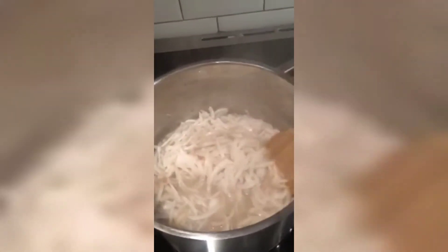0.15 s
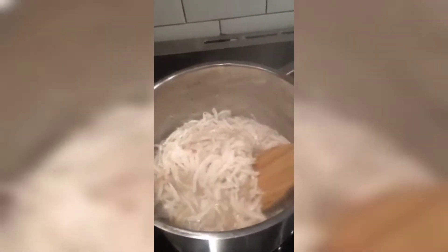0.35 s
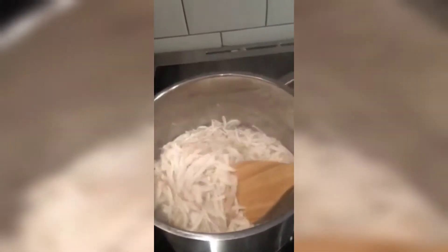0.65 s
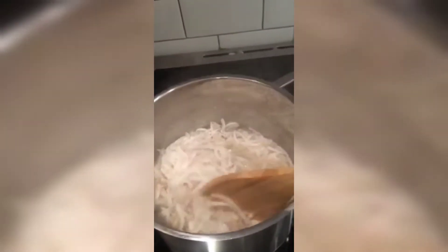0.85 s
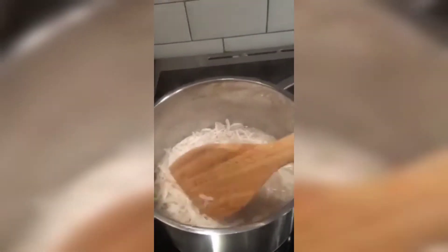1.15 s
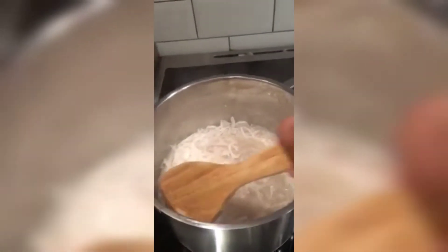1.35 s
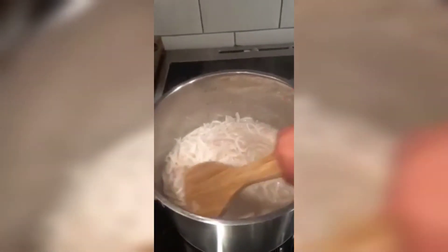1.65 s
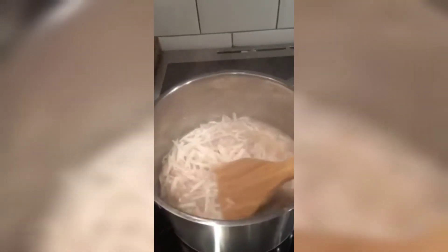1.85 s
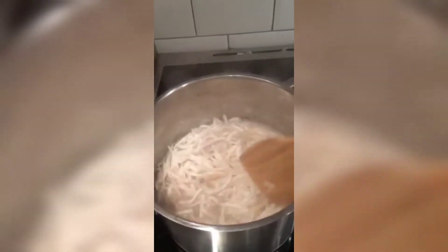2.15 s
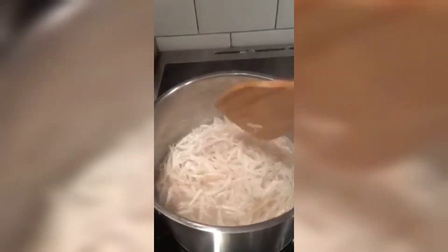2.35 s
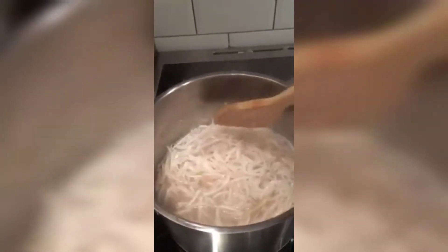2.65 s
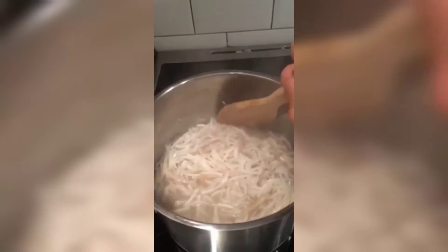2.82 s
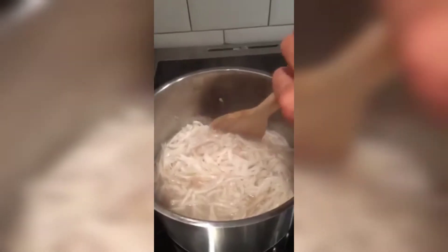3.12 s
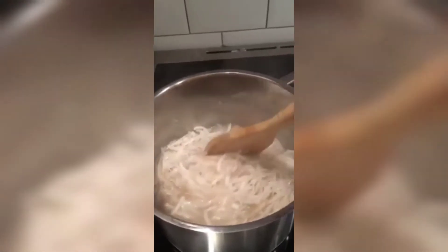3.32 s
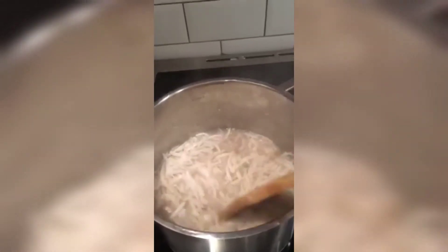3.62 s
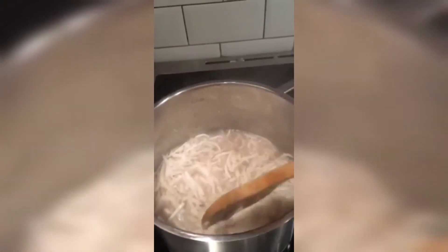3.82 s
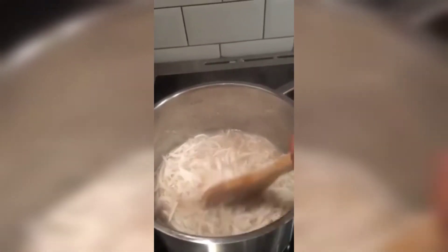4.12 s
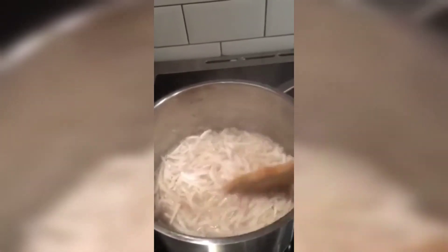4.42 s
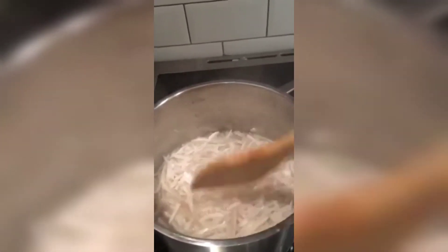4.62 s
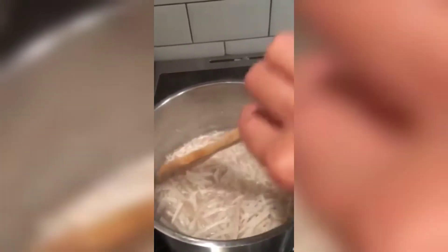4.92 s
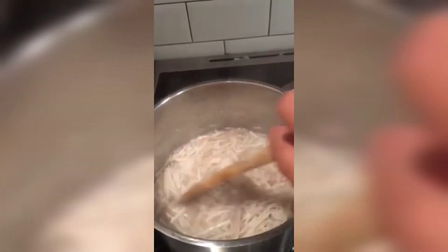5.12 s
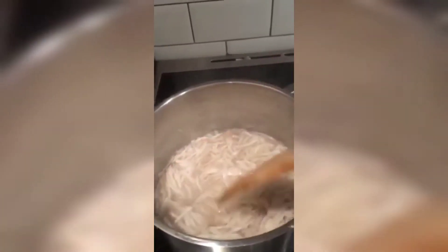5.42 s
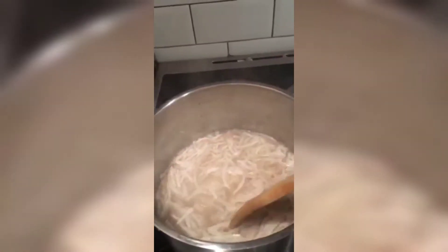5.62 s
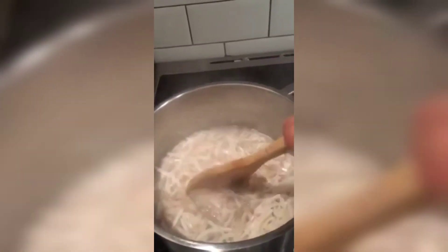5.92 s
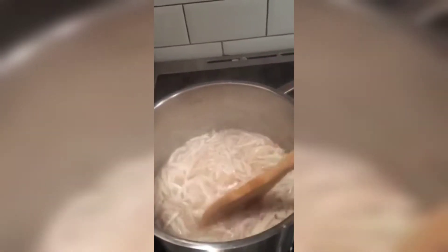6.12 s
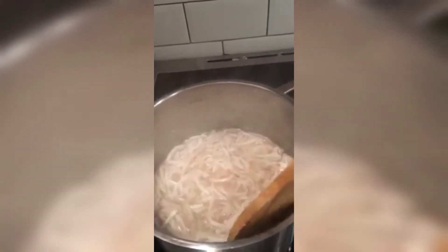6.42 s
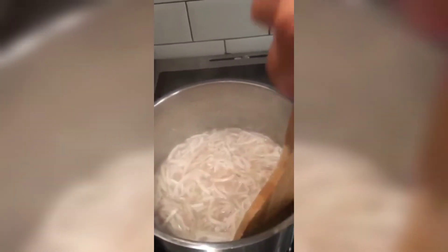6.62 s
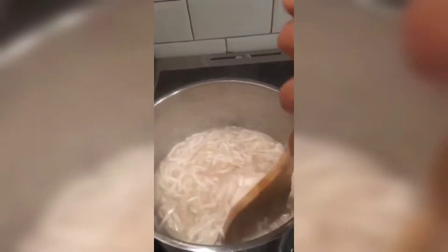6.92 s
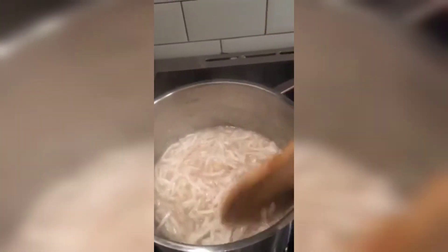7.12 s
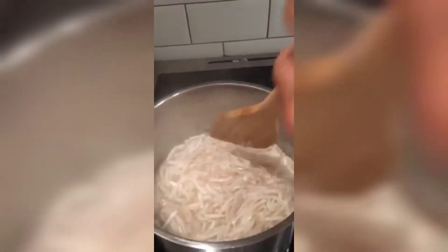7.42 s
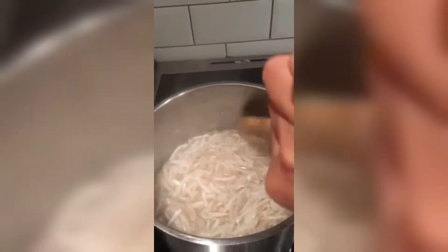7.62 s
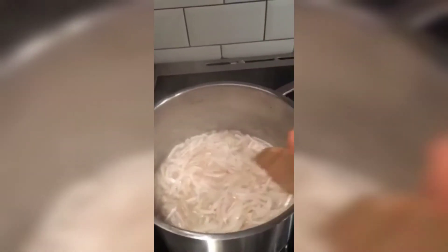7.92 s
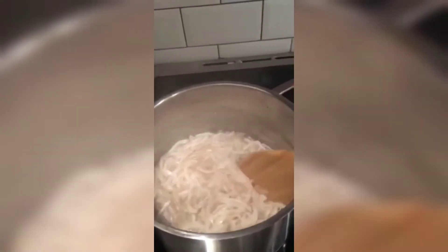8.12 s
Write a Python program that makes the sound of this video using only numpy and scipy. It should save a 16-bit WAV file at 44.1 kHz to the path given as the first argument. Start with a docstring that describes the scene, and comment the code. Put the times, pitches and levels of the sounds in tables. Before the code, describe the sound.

Close, quiet stirring of moist rice with a wooden spoon, occasional hard clacks on the metal pot, and a low kitchen motor hum beneath.

```python
"""Stirring wet rice in a steel pot

A wooden spoon stirs wet rice in a pot on a stove, close to the microphone.
Knocks set pot modes ringing and start decaying noise bands; drags are gritty noise through resonances.
The rice smacks (short noise bursts), plops (rising sines) and crackles (clicked resonators).
A kitchen motor hums in sines over resonant low rumble and noise-band room noise."""
import sys
import numpy as np
from scipy import signal
from scipy.io import wavfile

SR = 44100
rng = np.random.default_rng(int(sys.argv[2]) if len(sys.argv) > 2 else 0)


def wav_out(sig):
    """Save sig, one row per channel (or a flat mono array), as 16-bit PCM at SR to the path in sys.argv[1]."""
    wavfile.write(sys.argv[1], SR, np.round(np.clip(np.atleast_2d(sig).T, -1, 1) * 32767).astype(np.int16))


N = 364266

# Spoon on pot. Each row: time in seconds, ring in dB, clatter in dB before its common gain,
# contact corner in Hz (lower if softer), crack over clatter in dB, place.
KNOCKS = [(0.111, -42.5, -46.5, 1310, 5, "bottom edge"), (1.263, -14.5, -27, 3500, 12, "left wall"),
          (2.060, -33.5, -37, 1090, -22, "mid bottom"), (2.712, -20.5, -27.5, 3200, 5, "far wall"),
          (6.345, -25, -29.5, 1490, 7, "near wall"), (6.358, -27, -28, 1180, -12, "near wall"),
          (6.381, -36, -37, 3840, 2, "far wall"), (7.590, -11, -21, 4000, 4, "rim"),
          (8.079, -28.5, -31.5, 1170, -22, "bottom edge")]
# Motion of the wet rice. Each row: time in seconds, reference level of its fine sounds in dB.
WETNESS = [(0.0, -100), (0.27, -70.5), (0.55, -73.5), (0.85, -67), (1.5, -70.5), (2.11, -68), (2.39, -76),
           (2.78, -66), (2.97, -85), (3.47, -68), (3.8, -76.5), (3.98, -65.5), (4.6, -76.5), (5.27, -67.5),
           (5.45, -72), (6.3, -72.5), (6.53, -66.5), (7.2, -75.5), (7.55, -84), (7.73, -73.5), (8.26, -70)]


def from_db(db):
    """Decibels to gain."""
    return 10 ** (np.asarray(db) / 20)


def rms_one(x):
    """Scale to unit rms."""
    return x / np.sqrt(np.mean(x ** 2) + 1e-20)


def in_time(rows):
    """Columns of a curve at every sample."""
    s, *columns = np.transpose(rows)
    return [np.interp(np.arange(N) / SR, s, c) for c in columns]


def at_hz(points, hz):
    """Read a spectrum on a log-frequency axis."""
    points_hz, values = np.array(points).T
    return np.interp(np.log(hz), np.log(points_hz), values)


def drift(rate_hz):
    """Slow random wander of unit rms: noise through two equal poles at SR / 40, interpolated."""
    r = np.exp(-80 * np.pi * rate_hz / SR)
    noise = rng.standard_normal(N // 40 + 2002)
    slow = signal.lfilter([1], [1, -2 * r, r * r], noise)[2000:]   # settled part
    return np.interp(np.arange(N) / 40, np.arange(len(slow)), rms_one(slow))


def ring(clicks, hz, t60_s):
    """A unit click sets a decaying sine of initial height 1 ringing."""
    r, w = from_db(-60 / (t60_s * SR)), 2 * np.pi * hz / SR
    return signal.lfilter([0, np.sin(w)], [1, -2 * r * np.cos(w), r * r], clicks + 1e-18)


def fade(clicks, t60_s):
    """Each click starts an envelope that dies by 60 dB in t60_s."""
    return signal.lfilter([1], [1, -from_db(-60 / (t60_s * SR))], clicks + 1e-18)


def resonances(x, peaks):
    """Parallel resonances of alternating sign, summed to unit rms; peaks hold Hz, width in Hz, dB."""
    out = 0
    for k, (hz, width_hz, level_db) in enumerate(peaks):
        r = np.exp(-np.pi * width_hz / SR)
        b = (1 - r * r) / 2 * np.array([1, 0, -1])
        a = [1, -2 * r * np.cos(2 * np.pi * hz / SR), r * r]
        out = out + (-1) ** k * from_db(level_db) * signal.lfilter(b, a, x)
    return rms_one(out)


def band_pass(x, low_hz, high_hz):
    """Butterworth band-pass."""
    return signal.sosfilt(signal.butter(2, [low_hz, high_hz], "band", fs=SR, output="sos"), x)


def bands():
    """Third-octave bands of noise, flat per Hz, with their centres."""
    edges_hz = 22 * 2 ** np.arange(0, 9.1, 1 / 3)
    white = rng.standard_normal((2, N))   # neighbours use different noise
    for k, (low_hz, high_hz) in enumerate(zip(edges_hz, edges_hz[1:])):
        yield np.sqrt(low_hz * high_hz), band_pass(white[k % 2], low_hz, high_hz)


def blows(levels):
    """One click per knock."""
    clicks = np.zeros(N)
    clicks[[round(k[0] * SR) for k in KNOCKS]] = levels
    return clicks


def contact(hz):
    """Size of every blow at one frequency: a soft contact loses the treble."""
    level_db, corner_hz = np.array([k[2:4] for k in KNOCKS]).T
    return from_db(level_db) / (1 + (hz / corner_hz) ** 2)


def grains(per_s, low_hz, high_hz, cycles, spread_db):
    """Clumped random clicks of uneven size, dealt to resonators spread in pitch; unit rms."""
    sizes = from_db(spread_db * np.minimum(rng.exponential(1, N), 4)) * rng.choice([-1, 1], N)
    born = rng.random(N) < per_s * from_db(6.0 * drift(15)) / SR
    pitches_hz, dealt = np.geomspace(low_hz, high_hz, 18), rng.integers(0, 18, N)
    return rms_one(sum(ring(sizes * born * (dealt == k), hz, cycles / hz)
                       for k, hz in enumerate(pitches_hz)))


def hum():
    """Motor lines on one wandering shaft rate, surging rumble below the fundamental, and a drone."""
    # Each row: time in seconds, fundamental rms in dB.
    fundamental = [(0.0, -69), (0.41, -59), (1.03, -61.5), (1.7, -57.5), (2.02, -63), (2.42, -59.5),
                   (2.71, -55.5), (3.11, -63.5), (3.85, -56), (4.25, -68), (4.46, -60.5), (4.78, -57),
                   (5.41, -62.5), (5.96, -56), (6.42, -66), (6.76, -57), (7.41, -60), (8.07, -57)]
    # Upper motor lines. Each row: multiple of the shaft rate, mean rms level in dB.
    multiples = [(2, -71), (5, -71), (6, -72), (14, -87), (15, -88)]
    # The rumble ebbs. Each row: time in seconds, level in dB before surges.
    ebb = [(0.0, -54), (1.3, -63), (4.1, -68.5), (4.6, -86), (5.0, -72.5), (8.26, -68)]
    # Blurred low tone: centre in Hz, width in Hz, rms in dB.
    drone_peak = (88, 4.1, -72.5)
    mean_shaft_hz, rumble_surge_db = 57.4, 3.0
    turn = 2 * np.pi * np.cumsum(mean_shaft_hz * (1 + 0.002155 * drift(1))) / SR
    tone_db, = in_time(fundamental)
    lines = sum(from_db(level_db + 1.9 * drift(1)) * np.sin(round(k) * turn + k)
                for k, level_db in multiples)
    motor = np.sqrt(2) * (from_db(tone_db) * np.sin(turn) + lines)
    rumble = resonances(rng.standard_normal(N), [(46.0, 4.0, 0)])
    rumble_db = in_time(ebb)[0] + rumble_surge_db * drift(1.73)
    drone = from_db(drone_peak[2]) * resonances(rng.standard_normal(N), [drone_peak])
    return motor + from_db(rumble_db) * rumble + drone


def room_noise():
    """Steady noise bands whose levels waver, partly together."""
    # Each row: frequency in Hz, relative density in dB per Hz.
    spectrum = [(25, -6), (45, -7.5), (70, -3.5), (97, -3.5), (160, -10), (234, -10.5), (310, -10),
                (420, -16), (830, -18), (1500, -23), (2540, -30), (4500, -39), (5500, -41.5), (7000, -33),
                (9300, -41.5)]
    room_rms_db = -63
    room, together = 0, drift(7.8)
    for hz, noise in bands():
        room = room + noise * from_db(at_hz(spectrum, hz) + 0.56 * together + 2.0 * drift(10))
    return from_db(room_rms_db) * rms_one(room)


def drag():
    """Spoon-edge friction with grit, fluttering as grains pass under, excites bottom, hollow and wall."""
    # Each row: time of greatest pressure in seconds, length in seconds, peak level in dB,
    # hollow and wall levels against it in dB.
    strokes = [(0.03, 0.76, -64.5, 5, -1.5), (0.95, 0.5, -64, -15, -9.5), (4.40, 0.44, -61.5, -12, -10.5),
               (5.36, 0.48, -63.5, -9.5, -9.5), (6.31, 0.23, -65, -21, -18), (7.03, 0.5, -67, -14, -6.5),
               (7.57, 0.23, -68, -11, -6), (8.23, 0.28, -64, -9, -15)]
    # Dragged steel, air in the pot, pot wall. Each row: centre in Hz, width in Hz, relative level in dB.
    bottom, hollow, wall = [(1360, 190, -8), (1613, 113, -1.5), (1773, 51, 6), (2110, 160, -7.5)], [(844, 110, 0)], [(1128, 84, 6.5), (2905, 150, -2.5),
                                                            (3400, 260, -10.5)]
    rise_share, ends_db = 0.37, -19   # share of a stroke spent pressing down; level at both its ends
    gains, t = np.zeros((3, N)), np.arange(N) / SR
    for s, length_s, peak_db, hollow_db, wall_db in strokes:
        away = np.where(t < s, (s - t) / rise_share, (t - s) / (1 - rise_share)) / length_s
        level_db = peak_db + ends_db * np.minimum(away, 3) ** 2
        gains += from_db([level_db, level_db + hollow_db, level_db + wall_db])
    slip_sizes = from_db(2.7 * np.minimum(rng.exponential(1, N), 4)) * rng.choice([-1, 1], N)
    slips = (rng.random(N) < 1500 / SR) * slip_sizes   # 1500 per second on average
    friction = (rms_one(slips) + 1.2 * rng.standard_normal(N)) * from_db(1.6 * drift(40))
    return sum(gain * resonances(friction, body) for gain, body in zip(gains, [bottom, hollow, wall]))


def crackle():
    """Moved rice: many tiny snaps in clumps, each ringing a few cycles."""
    level_db = in_time(WETNESS)[0] - 4.0
    return from_db(level_db) * grains(1500, 2360, 9200, cycles=7.7, spread_db=-1.5)


def small_bubbles():
    """Scattered bubbles burst in the rice, more loudly while it is moved."""
    level_db = in_time(WETNESS)[0] - 12
    return from_db(level_db) * grains(60, 600, 6000, cycles=30.0, spread_db=4)


def pot_ring():
    """Each blow strikes every mode as its place dictates; a mode swells over a few cycles, then decays."""
    # Names of the struck places, in the column order of the modes.
    places = ["left wall", "far wall", "rim", "near wall", "mid bottom", "bottom edge"]
    # Pot and hob mode pitches in Hz.
    modes_hz = [97, 156, 253, 382, 538, 603, 662, 700, 750, 820, 937, 996, 1039, 1130, 1176, 1270, 1595,
                1650, 1696, 1760, 1933, 2450, 2600, 2790, 3011, 3280, 3560, 3828, 5290, 5626]
    # Each row, per mode: longest T60 in seconds, then dB for a blow at each place.
    modes = [(0.3, -51, -29.5, -33, -24, -14, -18), (0.2, -18.5, -13.5, -24, -12.5, -4, -8.5),
             (0.6, -33, -20, -27.5, -12.5, -13, -29.5), (0.29, -26.5, -58, -21.5, -26.5, -28.5, -29.5),
             (0.4, -27.5, -29, -30.5, -29, -30, -29.5), (1, -51, -32, -38.5, -49, -34, -51),
             (0.51, -20.5, -26.5, -42, -25, -36, -33), (0.29, -29, -52, -29, -18.5, -27, -40),
             (0.2, -22.5, -27, -19, -19, -23, -20), (0.33, -23, -10, -25, -15, -30, -16.5),
             (0.44, -26.5, -33, -27.5, -37, -24.5, -16.5), (0.3, -34, -45, -35, -26, -33, -18.5),
             (0.09, -40, -38, -43, -13, -3.5, 0.5), (0.27, -21.5, -24, -23, -17.5, -26, -20),
             (0.44, -37, -32, -29, -22.5, -40, -35), (0.43, -36, -30.5, -35, -14.5, -27, -37),
             (0.23, -36, -23, -50, -32, -46, -48), (0.1, -30, -9.5, -13, -38, -43, -45),
             (0.5, -44, -24, -23.5, -29, -45, -37), (0.25, -30, -18, -24, -27, -57, -46),
             (0.21, -41, -20, -40, -30, -44, -48), (0.096, -33, -8, -46, -47, -50, -49),
             (0.042, -36, -54, -31, -38, -48, -59), (0.2, -29, -19, -20.5, -43, -53, -53),
             (0.71, -36, -37, -27, -21, -54, -48), (0.15, -39, -14.5, -40, -29, -43, -47),
             (0.12, -28, -35, -17.5, -31, -55, -50), (0.62, -56, -24, -25, -30, -52, -51),
             (0.2, -38, -26, -29, -41, -37, -49), (0.22, -43, -25, -20.5, -32, -41, -32)]
    # Beating pairs: mode pitch in Hz to twin pitch in Hz.
    twins_hz = {253: 265, 382: 398}
    twin_share, twin_life = 0.54, 0.55   # strength and ring time of a twin against its mode
    place = [places.index(k[5]) for k in KNOCKS]
    force_db, _, corner_hz = np.array([k[1:4] for k in KNOCKS]).T
    signs, out = rng.choice([-1, 1], (len(modes), len(places))), 0
    for hz, (t60_s, *place_dbs), sign in zip(modes_hz, modes, signs):
        strength = from_db(force_db + np.array(place_dbs)[place]) * sign[place]
        hit = blows(strength / (1 + (hz / 2 / corner_hz) ** 4))
        t60_s = min(t60_s, 750 / hz)   # wet rice lets no mode ring beyond 750 cycles
        mode = ring(hit, hz, t60_s) - ring(hit, hz, 9.8 / hz)
        if hz in twins_hz:
            mode += twin_share * ring(hit, twins_hz[hz], twin_life * t60_s)
        # shifting rice and echoes make the higher modes flutter
        rough = min((hz / 2600) ** 1.4, .92)
        out = out + mode * (np.sqrt(1 - rough ** 2) + rough * drift(hz / 80))
    return out


def wall_shimmer():
    """Many weak wall modes, struck with new strengths by every blow."""
    # Each row: frequency in Hz, strength against the blow in dB.
    spectrum = [(700, -24), (1200, -21.5), (2000, -27.5), (3000, -27.5), (4000, -31), (5000, -36),
                (6000, -25), (9000, -33)]
    # Each row: frequency in Hz, T60 in seconds before each mode's random factor.
    t60s = [(700, 0.31), (2000, 0.22), (4000, 0.31), (6000, 0.26), (9000, 0.15)]
    pitches_hz = 700 + 8600 * rng.random(200) ** 1.4
    strengths = rng.standard_normal((len(KNOCKS), 200)).T
    lives = from_db(2.0 * rng.standard_normal(200))
    out = 0
    for hz, size, life in zip(pitches_hz, strengths, lives):
        hit = blows(contact(hz) * size * from_db(at_hz(spectrum, hz)))
        out = out + ring(hit, hz, life * at_hz(t60s, hz))
    return out


def clatter():
    """Noise bands: crack and clatter of wood on steel die fast, the kitchen tail slowly."""
    # Each row: frequency in Hz, relative level in dB.
    spectrum = [(120, -10.5), (300, -5), (800, -1), (1800, 1), (3500, 0), (6000, -1.5), (9000, 2.5)]
    # Clatter, then kitchen tail. Each row: frequency in Hz, T60 in seconds.
    clatter_t60s, kitchen_t60s = [(120, 0.45), (800, 0.039), (3000, 0.041), (9000, 0.058)], [(120, 0.91), (700, 0.59), (2000, 0.55), (5000, 0.42),
                                                       (9000, 0.38)]
    kitchen_db, common_gain_db = -16.5, 5
    knocks, sharp = 0, blows(from_db([k[4] for k in KNOCKS]))
    for hz, noise in bands():
        hit = blows(contact(hz) * from_db(at_hz(spectrum, max(hz, 60)))) * (hz > 70)
        crack = (fade(hit * sharp, 0.03) - fade(hit * sharp, 0.011)) * (hz > 600)
        rattle = fade(hit, at_hz(clatter_t60s, hz)) - fade(hit, 0.005)
        tail = fade(hit, at_hz(kitchen_t60s, hz)) - fade(hit, 0.29)   # builds up first
        knocks = knocks + noise * (crack + rattle + from_db(kitchen_db) * tail)
    return from_db(common_gain_db) * knocks


def plops():
    """A closing air pocket rings a few cycles while its pitch jumps up to the resting value."""
    # Each row: start in seconds, initial level in dB, resting pitch in Hz.
    pockets = [(0.394, -54, 1030), (1.842, -52, 740), (2.023, -57, 869), (3.6, -59, 1090),
               (4.082, -54, 1190), (4.801, -57, 751), (5.04, -56, 1040), (5.095, -47.5, 1050),
               (5.338, -54, 870), (5.565, -53, 1190), (5.68, -54.5, 546), (7.071, -61, 575)]
    out, t = np.zeros(N + 2048), np.arange(2048) / SR
    for s, peak_db, hz in pockets:
        turn = 2 * np.pi * np.cumsum(hz * (1 - 0.72 * np.exp(-t / 0.00082))) / SR
        level_db = peak_db - 60 * t * hz / 30   # 60 dB in 30 resting cycles
        out[round(s * SR):][:2048] += from_db(level_db) * np.sin(turn)
    return out[:N]


def smacks():
    """Wet grains let go of spoon and steel: a snap, then a short noisy echo from the pot walls."""
    # Each row: start in seconds, peak in dB, centre in Hz, width in octaves before limits.
    snaps = [(0.4823, -47.5, 4370, 0.96), (0.722, -50, 6600, 0.69), (0.7613, -51, 5340, 0.75),
             (1.4754, -47.5, 2830, 2.8), (1.8978, -54, 5980, 0.46), (1.9579, -41, 2930, 6.9),
             (1.9907, -46.5, 3850, 1.3), (2.3193, -46, 8090, 2.3), (2.8559, -41.5, 2400, 3.2),
             (3.3648, -44, 3400, 0.88), (3.4477, -46.5, 3700, 3), (3.8195, -47, 8590, 0.61),
             (3.8567, -44, 5070, 0.83), (3.921, -43, 4360, 0.72), (3.952, -40, 5800, 0.67),
             (4.0588, -45.5, 3110, 2.6), (4.121, -46, 5020, 0.84), (4.357, -42.5, 2630, 5.3),
             (4.4114, -43.5, 4900, 1.4), (4.782, -49.5, 7340, 1.3), (4.928, -55.5, 2850, 0.54),
             (4.986, -50, 2850, 1.8), (5.1707, -43.5, 3800, 0.94), (5.1896, -45.5, 6180, 0.98),
             (5.624, -47, 8670, 1.2), (5.714, -45.5, 6200, 2.4), (5.7284, -45.5, 6240, 1.6),
             (6.0252, -52, 3740, 0.81), (6.0483, -46, 4070, 1.3), (6.0594, -43, 8460, 2),
             (6.4313, -43, 3350, 1.3), (6.553, -45, 5170, 1.5), (6.6097, -41, 5640, 1.5),
             (6.6803, -31, 3240, 2.5), (7.0701, -50, 3040, 2.2), (7.1831, -40, 3330, 2.6),
             (7.5158, -51, 5400, 0.93), (7.729, -36.5, 2780, 2.7), (7.9573, -52, 6800, 1.2),
             (7.9948, -46, 7200, 0.91), (8.199, -51.5, 6350, 0.51)]
    echo_t60_s = 0.091
    out, t = np.zeros(N + 2048), np.arange(2048) / SR
    for (s, peak_db, hz, octaves), noise in zip(snaps, rng.standard_normal((len(snaps), 2048))):
        burst = 0.11 * noise * from_db(-60 * t / echo_t60_s)
        burst[0] += 1.6   # snap
        half = 2 ** (max(octaves, .3) / 2)
        burst = band_pass(burst, hz / half, min(hz * half, 12000))
        out[round(s * SR):][:2048] += from_db(peak_db) * burst / np.abs(burst).max()
    return out[:N]


def scene():
    """All sources at one microphone."""
    knocks = pot_ring() + wall_shimmer() + clatter()
    rice = smacks() + plops() + crackle() + small_bubbles()
    return (knocks + rice + drag() + hum() + room_noise())[None]


def record(dry):
    """The top is cut steeply; faint, slightly dull converter noise stays."""
    cutoff_hz, converter_db = 9750, -99   # noise level before its filter
    cut = signal.sosfilt(signal.cheby2(14, 56, cutoff_hz, fs=SR, output="sos"), dry)
    hiss = signal.lfilter([1, .35], [1], rng.standard_normal(dry.shape))
    return cut + from_db(converter_db) * hiss


dry = scene()
out = record(dry)
wav_out(out)
```